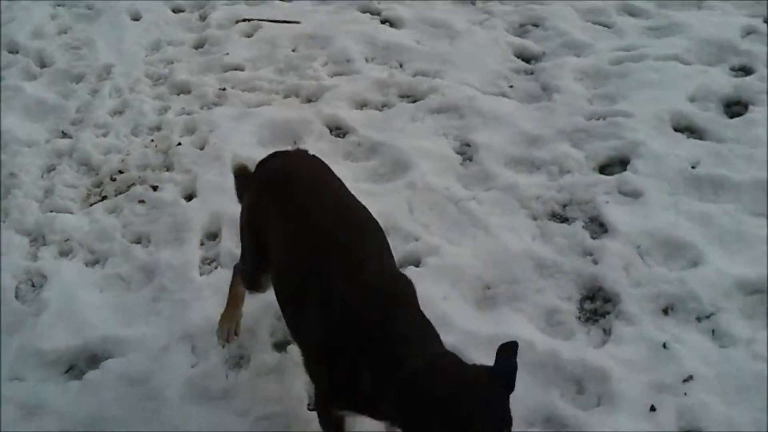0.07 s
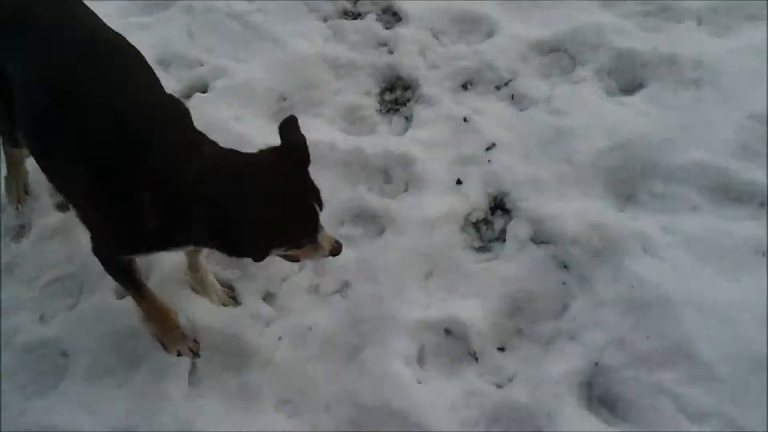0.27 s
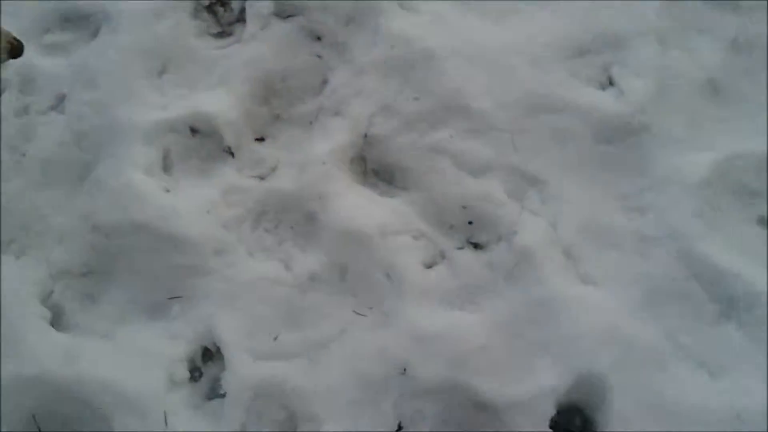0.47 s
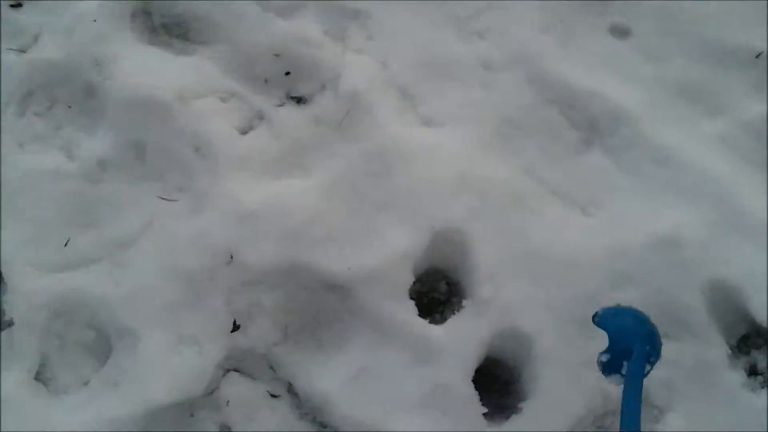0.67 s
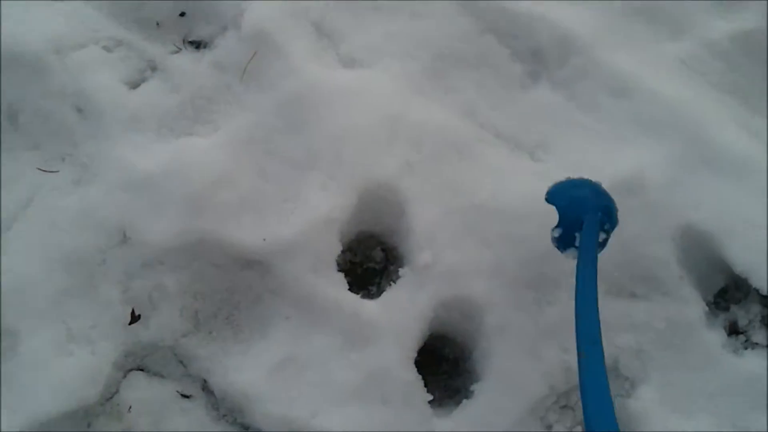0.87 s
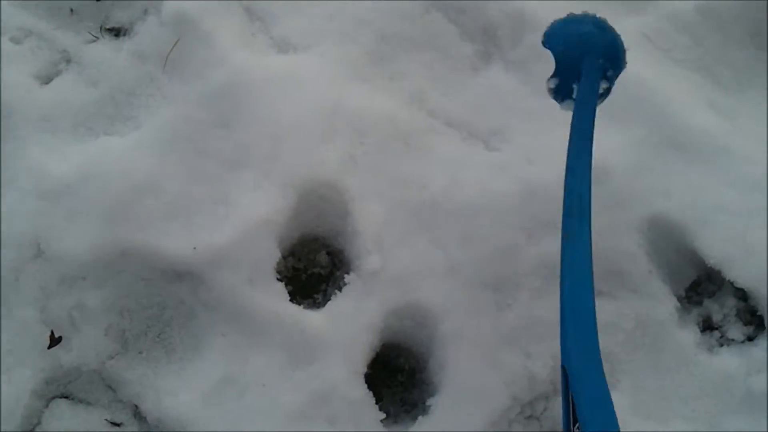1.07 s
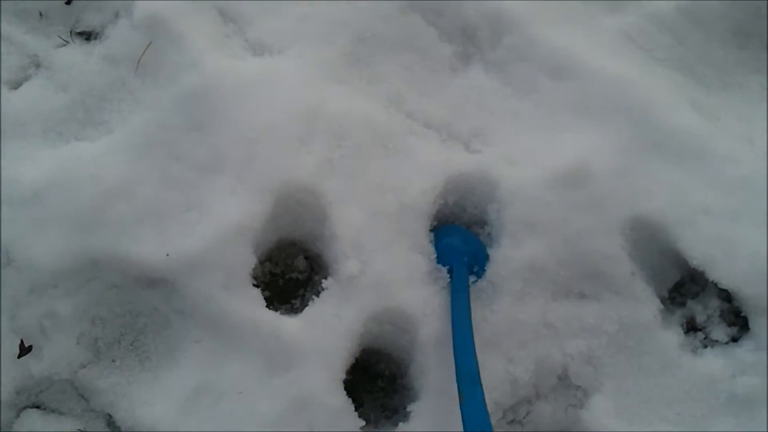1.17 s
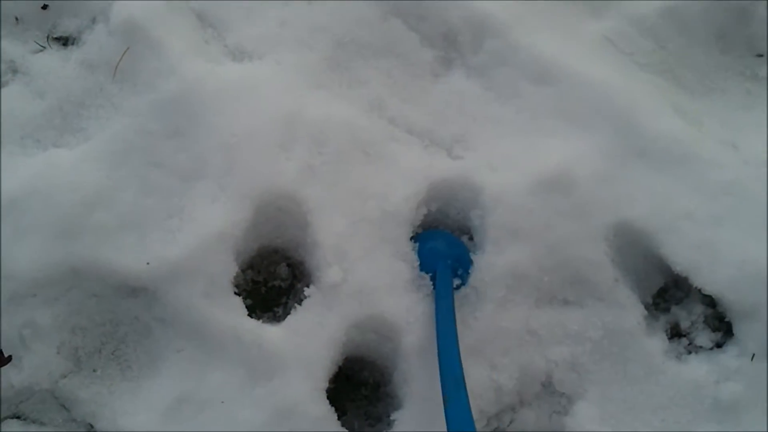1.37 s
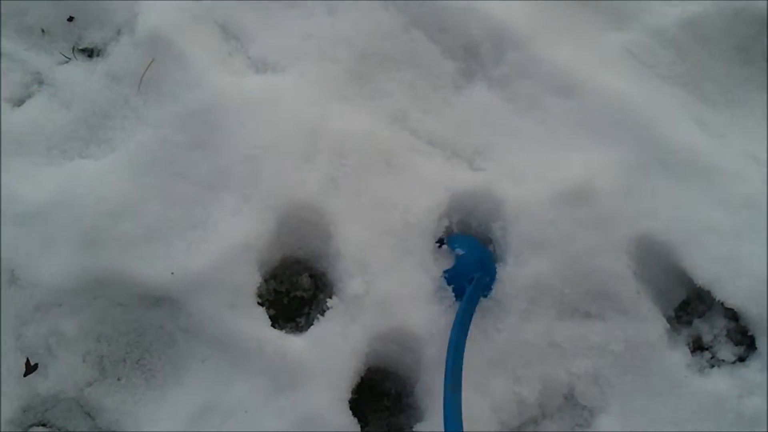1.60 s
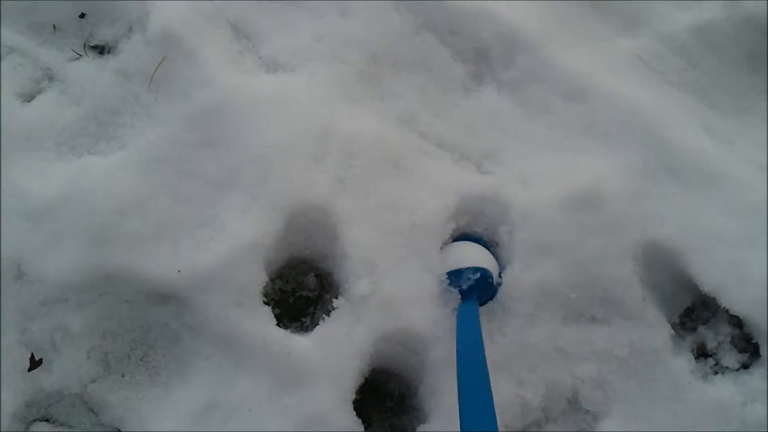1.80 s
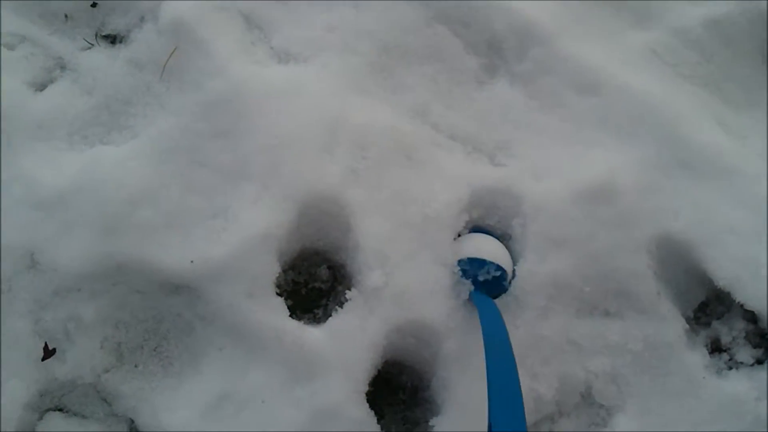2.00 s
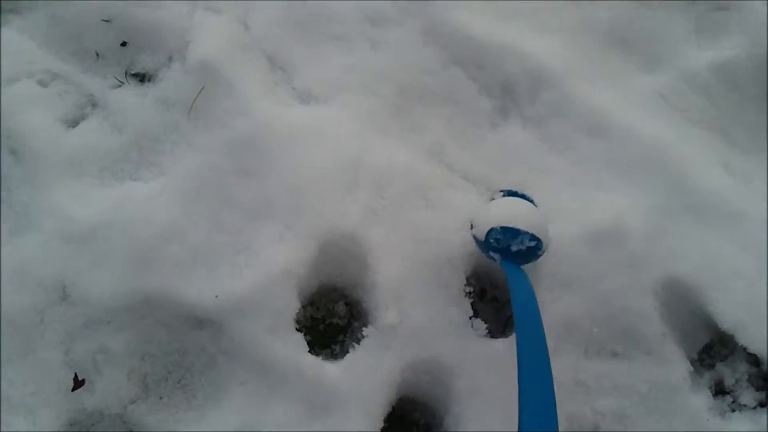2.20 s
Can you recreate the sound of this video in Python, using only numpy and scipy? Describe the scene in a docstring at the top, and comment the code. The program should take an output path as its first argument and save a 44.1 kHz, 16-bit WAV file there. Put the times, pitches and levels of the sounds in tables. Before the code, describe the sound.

Snow crunches and knocks dully underfoot, then a plastic scoop hits crusty snow with one short crisp crack, pauses, and drags with a thin gritty scrape, outdoors with light wind and distant traffic, slightly muffled treble.

```python
"""Scoop in packed snow

A plastic scoop jabs into packed snow and scrapes through it; boots and paws crunch nearby.
Random ice clicks ring the scoop's resonances or are coloured into footsteps; knocks are short tone bursts.
Filtered noise gives the wind buffeting the mono microphone and the hiss of distant traffic."""
import sys
import numpy as np
from scipy import signal
from scipy.fft import rfft, irfft
from scipy.io import wavfile
from scipy.ndimage import uniform_filter1d

SR = 44100
rng = np.random.default_rng(int(sys.argv[2]) if len(sys.argv) > 2 else 0)


def inscribe(sig):
    """Save sig as 16-bit PCM at rate SR to the path in sys.argv[1].

    A 1-D sig is mono; a 2-D sig holds one channel per row.
    Samples are clipped to [-1, 1] before scaling.
    """
    pcm = np.round(np.clip(np.atleast_2d(sig).T, -1, 1) * 32767)
    wavfile.write(sys.argv[1], SR, pcm.astype(np.int16))


def invert_db(level):
    """Linear amplitude ratio for a level in decibels (20 dB per decade), elementwise."""
    return 10 ** (np.asarray(level, dtype=float) / 20)


N = 99225  # samples, 2.25 s


def curve(table, col):
    """A table column joined by straight lines; -120 outside, but the last value holds if it ends past 2.2 s."""
    rows = np.array(table, float)
    after = -120 if rows[-1, 0] < 2.2 else None
    return np.interp(np.arange(N) / SR, rows[:, 0], rows[:, col], left=-120, right=after)


def unit(x):
    """Scale to rms 1."""
    return x / np.sqrt(np.mean(x ** 2))


def colour(x, points):
    """Causal filter with the given spectrum, from the folded cepstrum; the result has rms 1."""
    rows, size = np.array(points, float), 4096
    hz = np.maximum(np.arange(size // 2 + 1) * SR / size, 1)
    gain = invert_db(np.interp(np.log(hz), np.log(rows[:, 0]), rows[:, 1]))
    cepstrum = irfft(np.log(gain))
    # folding the second half onto the first gives minimum phase
    cepstrum[1:size // 2] *= 2
    cepstrum[size // 2 + 1:] = 0
    impulse = irfft(np.exp(rfft(cepstrum)))
    return unit(signal.fftconvolve(x, impulse)[:N])


def walk(rate_hz):
    """Random levels, each held for 1 / rate_hz seconds, then slewed into one another."""
    hold = int(SR / rate_hz)
    steps = np.repeat(rng.standard_normal(N // hold + 1), hold)
    return uniform_filter1d(steps, hold)[:N]


def crystals(per_s, spread_db, clump_db):
    """Random clicks of breaking ice crystals, in clumps, over a noise bed of finer ones."""
    breaks = rng.random(N) < per_s / SR
    sign = np.sign(rng.standard_normal(N))
    size = np.minimum(rng.exponential(size=N), 3.5)
    clicks = unit(breaks * sign * invert_db(spread_db * size))
    bed = 1.16 * rng.standard_normal(N)
    return unit((clicks + bed) * invert_db(clump_db * walk(160)))


def ring(x, hz, width_hz):
    """One resonance, gain 1 at its centre."""
    return signal.lfilter(*signal.iirpeak(hz, hz / width_hz, fs=SR), x)


# resonances of the scoop, the first row being the cup: pitch_hz [Hz], width_hz [Hz], gain_db [dB]
SCOOP_MODES = [(1976, 320, -8), (2700, 850, -9.5), (3550, 1430, -10), (4505, 310, -3), (5240, 760, -9),
               (6080, 264, -2.5), (6390, 290, -4), (7110, 1400, -8.5), (1360, 390, -20)]


def scoop_body(x, cup_gain):
    """Plastic resonances excited side by side with alternating polarity; the cup has its own drive."""
    out = 0
    for k, (hz, width_hz, gain_db) in enumerate(SCOOP_MODES):
        drive = x * cup_gain if k == 0 else x
        out = out + (-1) ** k * invert_db(gain_db) * ring(drive, hz, width_hz)
    return out


def scoop_rim(x):
    """The rim as one narrow resonance."""
    return ring(x, 6335, 280)


# the scoop driven into the snow: time_s [s], force_db [dB], cup_db [dB, before the common cup lift]
JAB_FORCE = [(1.258, -61, -9), (1.263, -33.5, 8), (1.2648, -28, -5), (1.27, -27, 5.5), (1.273, -24, -6.5),
             (1.277, -23, -21), (1.281, -21.5, -3.5), (1.285, -30.5, -4), (1.29, -28.5, -4.5),
             (1.294, -38, 5), (1.3, -43.5, -11), (1.308, -68, -5)]
# the scoop dragged through the snow: time_s [s], force_db [dB], cup_db [dB, before the common cup lift]
SCRAPE_FORCE = [(1.63, -67, -1), (1.64, -59, -5), (1.654, -40, -9.5), (1.664, -36.5, -14),
                (1.686, -43.5, -14), (1.692, -38, -16), (1.802, -35, -0.5), (1.826, -38, -2),
                (1.832, -32.5, -3), (1.84, -31.5, -6.5), (1.866, -36.5, -2), (1.878, -32.5, -11),
                (1.892, -41.5, 3), (1.902, -39.5, 0), (1.912, -42, -0.5), (1.936, -40, -6),
                (1.954, -36.5, -3), (2.004, -44.5, -3.5), (2.062, -61, -14), (2.168, -54, -8),
                (2.186, -44.5, -12), (2.228, -43, -12), (2.25, -56, -17)]


def scoop_grit():
    """Crystals breaking against the plastic ring its body; the cup's share moves on its own curve."""
    cup_lift_db, rim_db = 5, -0.5
    force = invert_db(np.maximum(curve(JAB_FORCE, 1), curve(SCRAPE_FORCE, 1)))
    cup_gain = invert_db(cup_lift_db + np.maximum(curve(JAB_FORCE, 2), curve(SCRAPE_FORCE, 2)))
    grit = crystals(per_s=2200, spread_db=2.5, clump_db=0.72)
    body = scoop_body(grit * force, cup_gain)
    rim = invert_db(rim_db) * scoop_rim(grit * invert_db(curve(JAB_FORCE, 1)))  # follows the jab force only
    reference = np.std(scoop_body(grit, 0.96))
    return (body - rim) / reference


def crack(x):
    """A crust crack: the scoop's ring plus a weak broad snap, focused in the treble."""
    snap_db = -22
    both = scoop_body(x, 0.88) + invert_db(snap_db) * ring(x, 5800, 2500)
    return ring(both, 4900, 3500)


# crust cracking on the scoop: time_s [s], level_db [dB, peak of the crack without the rim]
CRUST_CRACKS = [(1.266, -17), (1.2685, -16.5), (1.2758, -17), (1.278, -15), (1.2835, -16), (1.2863, -15),
                (1.6592, -31), (1.759, -32), (1.787, -30), (1.79, -26), (1.8135, -30.5), (1.832, -22),
                (1.836, -25), (1.838, -23), (1.842, -24), (1.85, -24), (1.871, -30), (1.879, -27),
                (1.901, -16.5), (1.908, -32), (1.932, -26.5), (1.95, -25.5)]


def scoop_cracks():
    """Single impulses ring the scoop; during the jab the rim joins with reversed polarity."""
    impulses = np.zeros(N)
    for time_s, level_db in CRUST_CRACKS:
        impulses[int(time_s * SR)] = invert_db(level_db)
    single = 1. * (np.arange(N) == 0)
    peak = np.abs(crack(single)).max()
    in_jab = curve(JAB_FORCE, 1) > -90
    rim = invert_db(1.0) * scoop_rim(impulses * in_jab)  # 1 dB
    return (crack(impulses) - rim) / peak


# snow under feet: time_s [s], level_db [dB], dull_db and fine_db [dB, relative to the crisp part]
TREAD_LEVELS = [(0, -52.5, 1, 15.5), (.02, -59.5, 6, 8.5), (.1, -52.5, 7, 8), (.15, -59, 11.5, 9.5),
                (.29, -66, 13.5, 13), (.31, -49, 6, -1.5), (.33, -52.5, 1.5, 5), (.39, -45, -1, -5.5),
                (.5, -42, 2, -3.5), (.53, -44.5, 2.5, 2), (.572, -45.5, 7.5, -6), (.579, -42, -0.5, 6),
                (.605, -40, 2.5, -1.5), (.622, -38, 0.5, -1), (.627, -32, -4, -3.5), (.64, -36, 2, 1.5),
                (.653, -36, 0.5, -13), (.662, -39, -0.5, -7), (.69, -44.5, 1.5, -5.5), (.79, -44.5, 4, -3),
                (.805, -43, 1, 7.5), (.835, -41, 2.5, -3), (.89, -43, -0.5, -2.5), (1.0, -45.5, 3.5, -1.5),
                (1.112, -46, -4, -3), (1.122, -40.5, 3, 2), (1.145, -45.5, -1, -1.5), (1.165, -53, 6, 1),
                (1.255, -54, -2, 3), (1.31, -51.5, 5.5, 8.5), (1.35, -54.5, 7, 4), (1.46, -53, 6, 1),
                (1.5, -57.5, 1.5, 1), (1.64, -68, -4, 7)]
# crisp crunch spectrum: pitch_hz [Hz], density_db [dB per Hz, relative]
CRISP_COLOUR = [(800, -13.5), (1400, -3), (1950, -5), (2300, -5.5), (2800, -3.5), (3500, -3), (4500, -8),
                (6000, -25.5)]
# dull crunch spectrum: pitch_hz [Hz], density_db [dB per Hz, relative]
DULL_COLOUR = [(150, -32), (300, -2), (500, -1.5), (800, -0.5), (1300, -5), (2500, -20)]
# fine crunch spectrum: pitch_hz [Hz], density_db [dB per Hz, relative]
FINE_COLOUR = [(2500, -24), (4000, -1.5), (5200, 0), (6400, 1.5), (7400, -5), (9000, -11)]


def feet():
    """Snow crunching under boots and paws: three crystal layers, each partly shared, partly its own."""
    shared = 0.5 * crystals(per_s=2200, spread_db=2.5, clump_db=0.84)
    crisp = colour(shared + crystals(1100, 3.6, 3.6), CRISP_COLOUR)
    dull = colour(shared + crystals(900, 1.6, 2.7), DULL_COLOUR)
    fine = colour(shared + crystals(4000, 1.3, 2.16), FINE_COLOUR)
    crunch = crisp + invert_db(curve(TREAD_LEVELS, 2)) * dull + invert_db(curve(TREAD_LEVELS, 3)) * fine
    return invert_db(curve(TREAD_LEVELS, 1)) * crunch


# lumps of snow knocking: centre_s [s], peak_db [dB], pitch_hz [Hz, at the centre], length_cycles [cycles]
LUMP_KNOCKS = [(0.203, -34.5, 143, 2.4), (0.254, -31.5, 161, 2.3), (0.302, -31, 141, 1.1),
               (0.328, -23.5, 140, 4.1), (0.349, -26.5, 252, 1.4), (0.368, -28.5, 94, 1),
               (0.378, -24.5, 202, 0.76), (0.3975, -32.5, 170, 1), (0.445, -26.5, 500, 0.87),
               (0.457, -27, 99.5, 1.4), (0.497, -26, 2420, 3.5), (0.5093, -22.5, 318, 1.66),
               (0.5093, -24, 4000, 1.52), (0.511, -29, 950, 0.94), (0.485, -31.5, 257, 1.7),
               (0.616, -26.5, 2250, 4.7), (0.627, -26, 2280, 8.4), (0.6302, -30, 2000, 9),
               (0.6325, -26, 2400, 2), (0.6349, -25, 1100, 1.2), (0.644, -24.5, 2200, 4.1),
               (0.6483, -21, 2500, 1.8), (0.6538, -31, 2900, 2.3), (0.628, -24, 590, 0.97),
               (0.6495, -30, 706, 2), (0.5945, -28, 583, 1.3), (0.6586, -20.5, 940, 1.8),
               (0.810, -21.5, 720, 0.39), (0.9368, -33, 2700, 5.7), (0.9419, -16.5, 783, 2.17),
               (0.9445, -26.5, 327, 1.5), (1.1245, -24, 660, 1.3), (1.127, -35, 270, 2),
               (1.209, -38.5, 114, 1.58), (1.2843, -18, 940, 1.22), (1.277, -30, 900, 2.2),
               (1.288, -29, 655, 2.2), (1.444, -39, 91, 1.9)]


def knocks():
    """Each knock is a short tone burst under a gaussian window, its pitch rising slightly."""
    glide = 0.026  # pitch rise per cycle, as a share of pitch_hz
    t, out = np.arange(N) / SR, 0
    for centre_s, peak_db, pitch_hz, length_cycles in LUMP_KNOCKS:
        turns = (t - centre_s) * pitch_hz
        window = np.exp(-(2 * turns / length_cycles) ** 2)
        tone = np.cos(2 * np.pi * turns * (1 + glide * turns / 2))
        out = out - invert_db(peak_db) * window * tone
    return out


# gusts at the microphone: time_s [s], level_db [dB, before flutter]
GUST_LEVELS = [(0, -53), (.12, -45), (.17, -53), (.2, -49), (.25, -38), (.275, -46), (.315, -33.5),
               (.35, -34), (.39, -37), (.43, -43.5), (.6, -46), (.9, -50.5), (1.1, -48.5), (1.2, -44.5),
               (1.3, -51.5), (1.43, -49.5), (1.55, -54), (1.78, -51.5), (2.25, -52.5)]
# wind spectrum: pitch_hz [Hz], density_db [dB per Hz, relative]
WIND_COLOUR = [(15, -44.5), (25, -12), (151, -1.5), (267, -7.5), (339, -21.5), (395, -18.5), (515, -32),
               (700, -22), (910, -49.5), (1540, -120)]


def wind():
    """Wind buffeting the microphone: low coloured noise that follows the gusts and flutters."""
    flutter_db = 1.9 * walk(35.6)
    return invert_db(curve(GUST_LEVELS, 1) + flutter_db) * colour(rng.standard_normal(N), WIND_COLOUR)


# distant traffic spectrum: pitch_hz [Hz], density_db [dB per Hz, relative]
TRAFFIC_COLOUR = [(18, -46.5), (30, -42.5), (93, -2.5), (166, -19.5), (205, -13.5), (713, -7.5), (990, -3),
                  (1440, -12), (4550, -26), (7270, -29.5), (8180, -68.5), (10600, -100)]


def traffic():
    """Distant traffic: smooth coloured noise around a steady level, swelling a little."""
    level_db = -45.5
    swell_db = 1.2 * walk(2.65)
    return invert_db(level_db + swell_db) * colour(rng.standard_normal(N), TRAFFIC_COLOUR)


def scene():
    """One microphone, deaf to the lowest bass, feeds both channels."""
    air = scoop_grit() + scoop_cracks() + feet() + knocks() + wind() + traffic()
    low_cut = signal.butter(2, 32, "high", fs=SR, output="sos")
    return np.tile(signal.sosfilt(low_cut, air), (2, 1))


def band_limit(x):
    """A steep low-pass at the top of the band."""
    return signal.sosfilt(signal.butter(12, 8330, fs=SR, output="sos"), x)


def record(dry):
    """The recorder's narrow audio band: a gentle treble roll-off, then a steep stop."""
    roll_off = signal.butter(4, 7010, fs=SR, output="sos")
    steep_stop = signal.cheby2(16, 75, 8640, fs=SR, output="sos")
    soft = signal.sosfilt(roll_off, dry)
    finished = signal.sosfilt(steep_stop, soft)
    return band_limit(finished)


dry = scene()
out = record(dry)
inscribe(out)
```